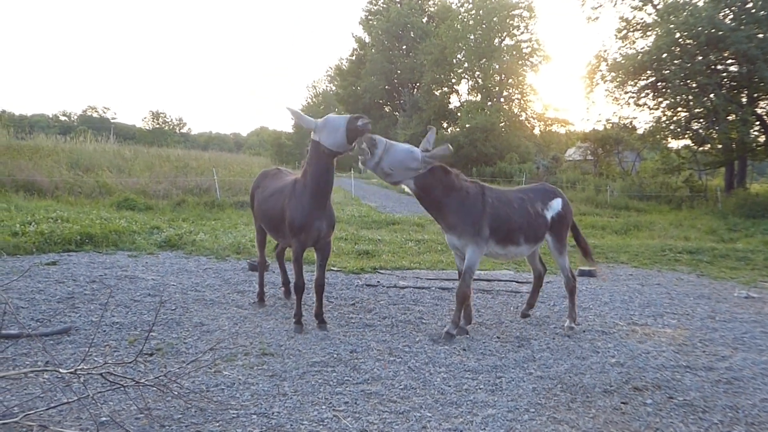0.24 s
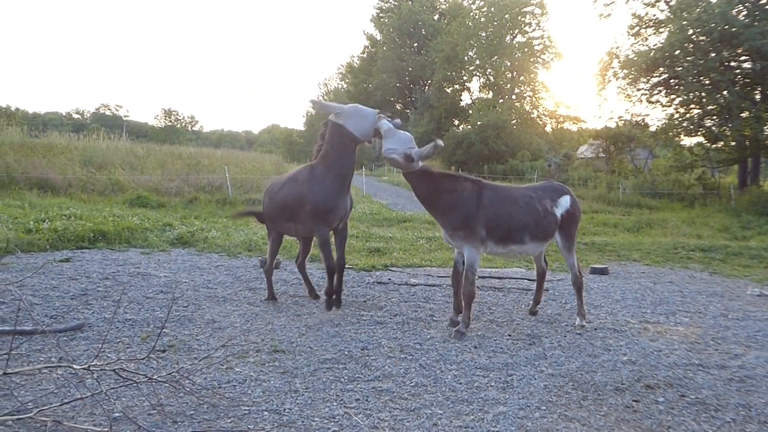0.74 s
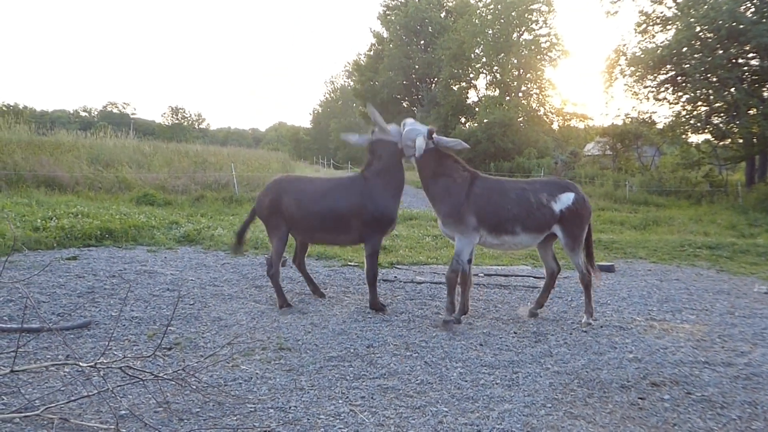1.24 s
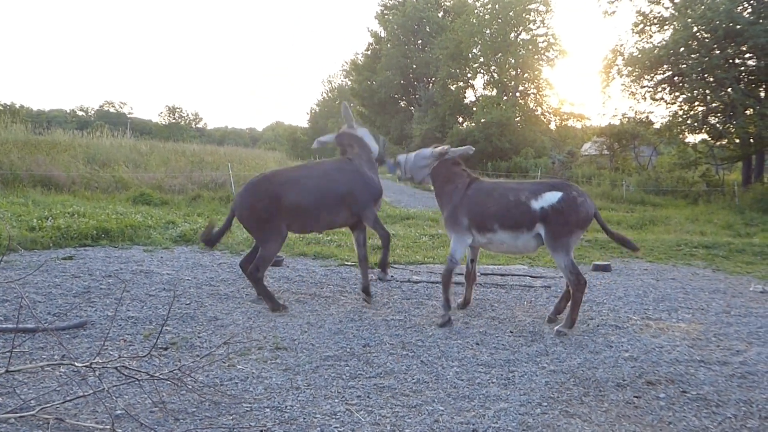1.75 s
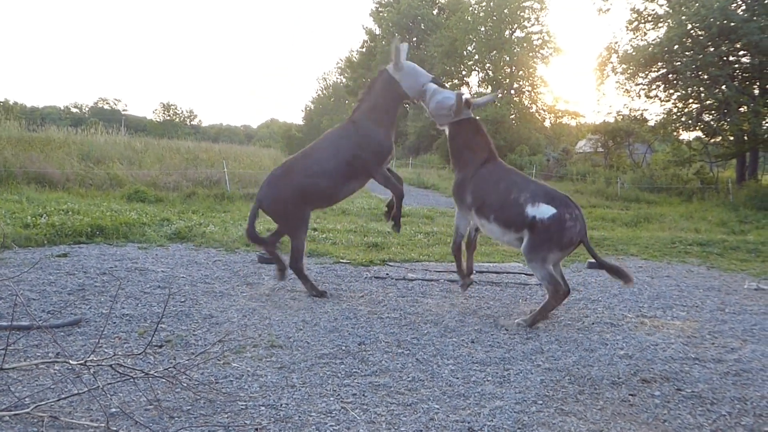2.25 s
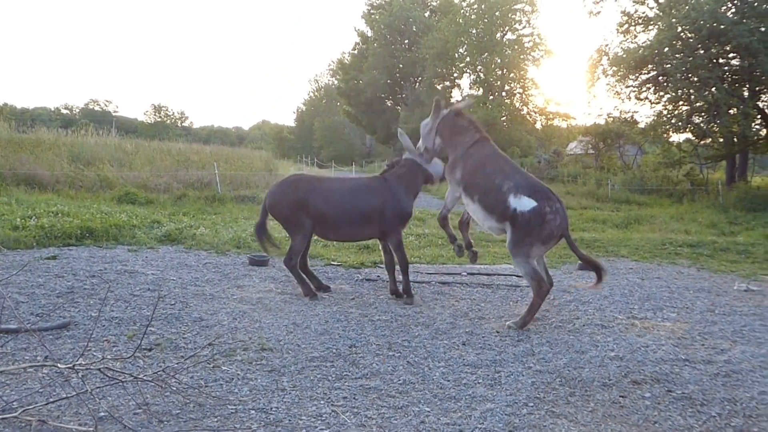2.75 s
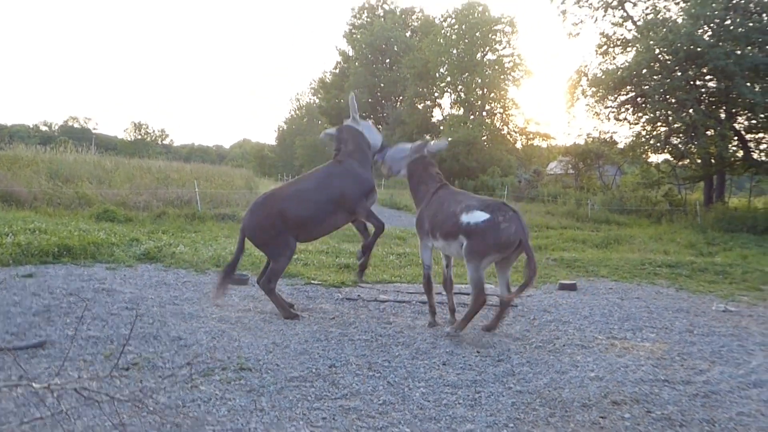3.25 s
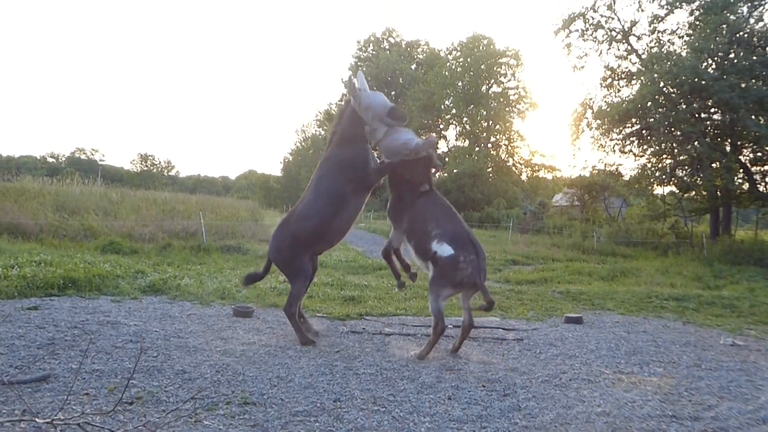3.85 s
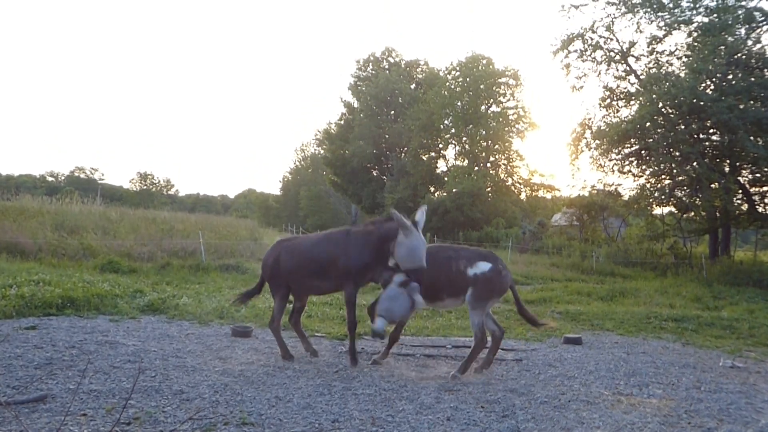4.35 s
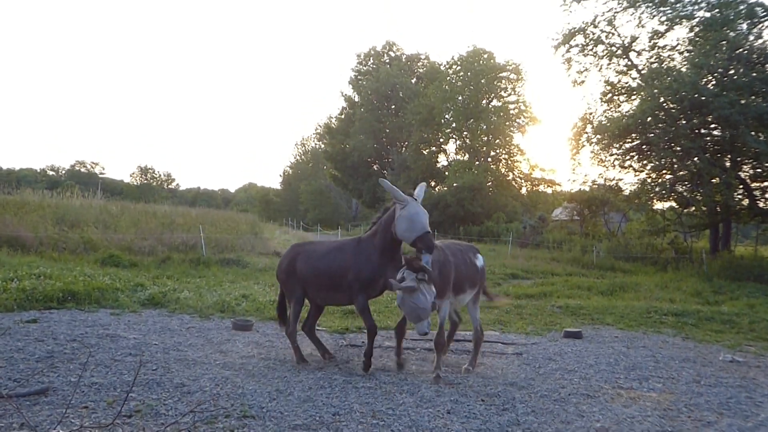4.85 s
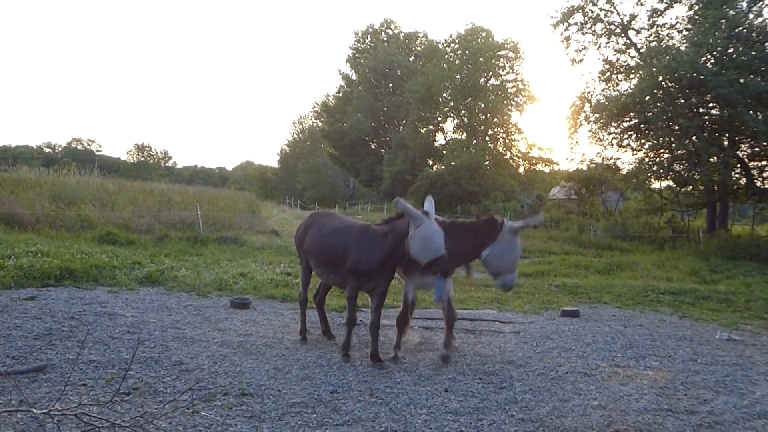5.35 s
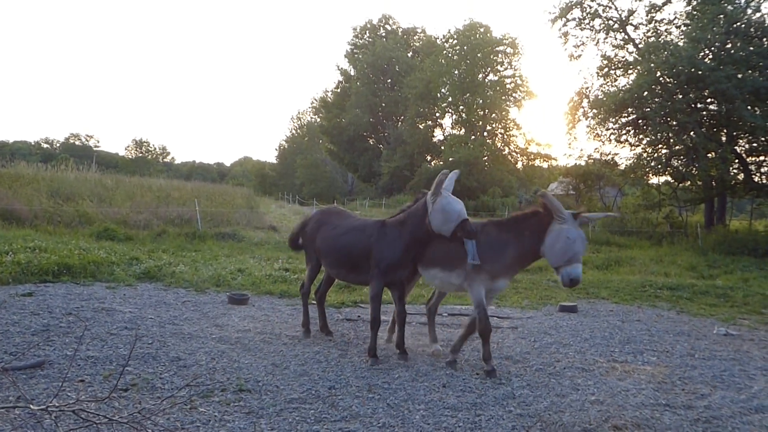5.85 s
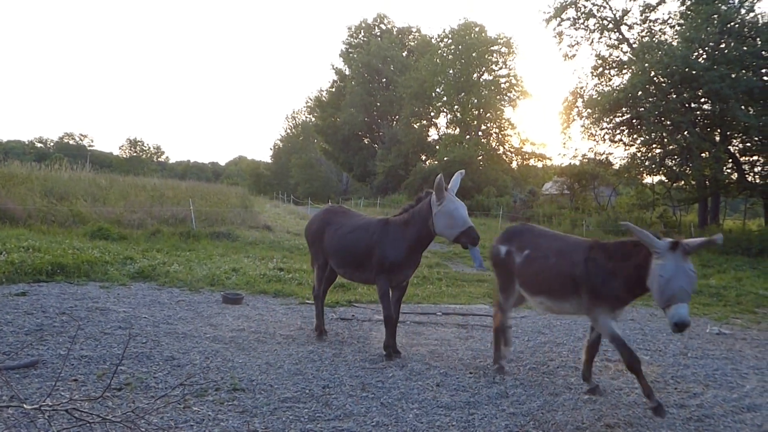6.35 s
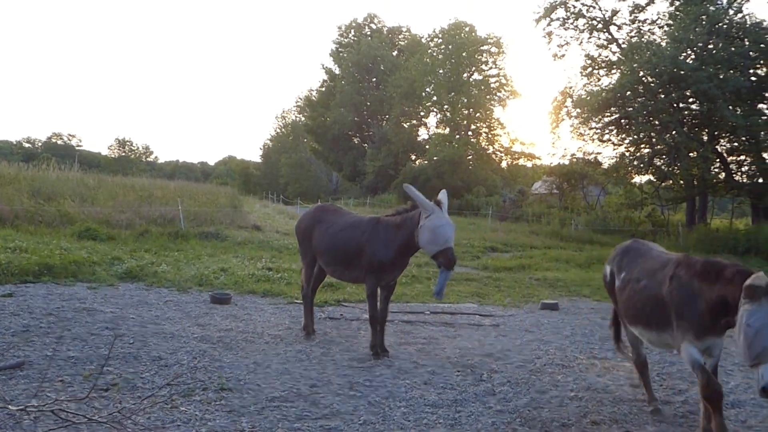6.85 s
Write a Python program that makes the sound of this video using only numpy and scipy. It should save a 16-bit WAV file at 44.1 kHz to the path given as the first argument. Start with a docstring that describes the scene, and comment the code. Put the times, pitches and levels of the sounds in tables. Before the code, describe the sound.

Hooves shift and stamp on a gravel yard, first in separate scrapes, then in heavy flurries with bright stone clicks, dry cracks and woody hoof knocks as two donkeys rear and wrestle. After more twisting and scraping, one walks off briskly past the close stereo microphones, crunching more crisply. The space is open and dry, with quiet steady air noise and a barely noticeable distant machine hum.

```python
"""Donkey hooves stamp and drag on a gravel yard: two animals play-fight, then one trots up to the microphone.
Their steps are many tiny random stone contacts, coloured as grit, pebbles, hoof and earth, with rise and fall.
Kicked stones click in short tones, pinched stones crack in snaps, and hollow knocks ring as fading tones.
Behind them, coloured noise makes an open-air rush with a thin hiss, and slow-wavering tones make a low hum."""
import sys
import numpy as np
from scipy import signal
from scipy.fft import rfft, irfft, next_fast_len
from scipy.io import wavfile
from scipy.ndimage import uniform_filter1d, map_coordinates

SR = 44100
rng = np.random.default_rng(int(sys.argv[2]) if len(sys.argv) > 2 else 0)


def master(y):
    """Save y as 16-bit WAV."""
    cut = np.clip(np.atleast_2d(y).T, -1, 1)
    pcm = np.round(cut * 32767)  # scale
    wavfile.write(sys.argv[1], SR, pcm.astype(np.int16))


N = 313659  # length in samples, about 7.1 s

# In this file, t60 or fade_s is the time in seconds to fade by 60 dB.
# Most sounds are (mid, side) pairs: what both ears share, and how they differ.


def amp(db):
    """Turn decibels into a gain."""
    return 10 ** (np.asarray(db) / 20)


def unit(x):
    """Scale a sound to an rms (average strength) of 1."""
    return x / np.sqrt(np.mean(x ** 2) + 1e-20)


def along(points, hz):
    """Read a curve of (pitch_hz, value) points, with pitch on a log axis."""
    point_hz, value = np.transpose(points)
    return np.interp(np.log(hz + 1), np.log(point_hz + 1), value)


def over_time(points):
    """Read a curve of (start_s, value) points at every sample."""
    return np.interp(np.arange(N) / SR, *np.transpose(points))


def wobble(rate, size=16):
    """A smooth random curve through `rate` random points a second."""
    coarse = np.arange(0, N + size, size)
    knots = rng.standard_normal(int(N * rate / SR) + 4)
    curve = map_coordinates(knots, [coarse * rate / SR])
    return np.interp(np.arange(N), coarse, curve)


def filtered(x, response):
    """Multiply the spectrum of x by a function of frequency."""
    m = next_fast_len(N + SR // 2)
    spectrum = rfft(x, m) * response(np.fft.rfftfreq(m, 1 / SR))
    return irfft(spectrum, m)[..., :N]


def coloured(x, spectrum, size=4096):
    """Give x a tone colour with a filter that never sounds early, so clicks keep sharp fronts."""
    gain = amp(along(spectrum, np.fft.rfftfreq(size, 1 / SR)))
    cepstrum = irfft(np.log(gain + 1e-6))
    # folding the second half onto the first packs the filter's energy at its start
    cepstrum[1:size // 2] *= 2
    cepstrum[size // 2 + 1:] = 0
    taps = irfft(np.exp(rfft(cepstrum)))
    return signal.oaconvolve(x, taps[None], axes=1)[:, :N]


def patchy(x, depth_db):
    """Shift the tone colour at random from moment to moment, then scale to rms 1."""
    z = signal.stft(x, nperseg=512)[2]
    field = rng.standard_normal(z.shape[1:])
    field = uniform_filter1d(field, size=4, axis=0)
    field = uniform_filter1d(field, size=5, axis=1)
    return unit(signal.istft(z * amp(depth_db * unit(field)), nperseg=512)[1][:, :N])


def stone(t60, snap, size=256):
    """One stone contact of energy 1: a share `snap` in one sharp sample, the rest in a brief noisy ring."""
    ring = rng.standard_normal((2, size)) * amp(-60 * np.arange(size) / SR / t60)
    ring[:, 0] = 0
    snap = np.clip(snap, 0, 1)
    ring *= np.sqrt(1 - snap) / np.linalg.norm(ring, axis=1, keepdims=True)
    ring[:, 0] = np.sqrt(snap) * rng.choice([-1, 1], 2)
    return ring


def impact(spectrum, t60, snap):
    """One hard contact with the given colour, peak 1."""
    hit = coloured(stone(t60, snap), spectrum)
    return hit / np.abs(hit).max(axis=1, keepdims=True)


def add_at(out, s, sound):
    """Mix a short sound into out, starting at s seconds."""
    out[:, round(s * SR):][:, :sound.shape[1]] += sound


# Colour of the open-air rush and thin hiss: pitch_hz, level_db (relative, per Hz)
AIR_COLOUR = [(25, -19), (55, -34), (75, -18), (110, -1.5), (150, 0), (230, 0), (330, -1.5), (500, 2),
              (900, -1), (1300, -5.5), (1700, -11.5), (3000, -13.5), (6000, -13), (10000, -16),
              (15500, -29)]
# Tones of far machinery: pitch_hz, level_db (rms, about which it wavers)
HUM_TONES = [(119.5, -60.5), (187, -58.5), (220, -57), (280, -68.5)]


def background():
    """Air is coloured noise; far machinery is a few tones that waver in level and phase."""
    t = np.arange(N) / SR
    rush = patchy(coloured(rng.standard_normal((2, N)), AIR_COLOUR), depth_db=2.0)
    air = amp(-46.5 + 0.25 * wobble(5.2)) * rush
    for hz, db in HUM_TONES:
        level = amp(db + 1.7 * wobble(6)) * np.sqrt(2)
        phase = 2 * np.pi * hz * t + 0.63 * wobble(6.4)
        air[0] += level * np.sin(phase)
    return air


# Hollow knocks of hooves on the ground and of the animals against each other:
# start_s, pitch_hz, fade_s, level_db (before KNOCK_MIX_DB, which lowers the ringing)
KNOCK_HITS = [(0.179, 890, .02, -29), (.19, 780, 0.028, -22), (.215, 820, 0.017, -17),
              (.259, 670, 0.019, -16.5), (.5192, 1273, 0.072, -22), (.521, 774, .03, -19),
              (0.5412, 860, 0.019, -12), (.544, 470, 0.035, -18), (.633, 640, .015, -15),
              (.648, 1120, 0.017, -13), (.648, 447, .025, -21), (1.593, 845, 0.018, -10.5),
              (1.599, 624, 0.015, -9), (1.659, 1280, .02, -16), (1.689, 1250, .03, -15),
              (1.697, 740, 0.025, -12.5), (1.718, 776, 0.019, -15), (1.779, 1280, .06, -21),
              (1.793, 1240, 0.031, -14.5), (1.8032, 780, 0.027, -11.5), (1.817, 1175, 0.036, -14),
              (1.841, 1185, 0.037, -21), (2.176, 845, 0.14, -28), (2.21, 715, .05, -25),
              (2.218, 255, 0.11, -27), (2.33, 165, .065, -19.5), (2.3758, 447, 0.095, -15),
              (2.376, 320, 0.02, -22), (2.467, 656, 0.04, -21.5), (2.504, 1150, 0.071, -23),
              (2.544, 1250, 0.02, -15.5), (2.595, 1000, .018, -20), (3.096, 1225, 0.033, -15),
              (3.1, 92, .26, -31), (3.106, 172, 0.091, -29), (3.1011, 1306, 0.024, -9),
              (3.108, 1150, 0.026, -13), (3.1172, 790, .03, -18), (3.124, 1280, .03, -15),
              (3.129, 234, 0.054, -29), (3.1365, 700, 0.011, -9), (3.6735, 1410, 0.015, -2),
              (3.674, 690, 0.014, -15), (3.681, 1420, .02, -14), (3.739, 796, 0.028, -18),
              (3.932, 895, .018, -17), (4.0815, 635, 0.013, -2), (4.094, 1300, .035, -26),
              (4.1141, 740, 0.038, -17.5), (4.198, 710, 0.026, -18), (4.209, 154, 0.11, -26),
              (4.24, 453, .025, -16), (4.344, 890, .02, -23), (4.491, 200, .07, -27),
              (4.562, 332, 0.036, -16), (4.624, 230, .04, -24), (4.845, 129, .11, -25),
              (4.881, 800, .025, -23), (5.283, 765, 0.028, -23), (5.336, 1070, 0.012, -9),
              (5.475, 745, 0.15, -28.5), (6.1504, 700, 0.012, -8.5), (6.491, 767, .04, -23),
              (6.501, 1300, 0.017, -18.5), (6.587, 1300, .02, -25)]
KNOCK_MIX_DB = -7.5
KNOCK_SWELL_S = .002  # shortest time scale of the swell


def knocks():
    """Each knock rings one fading, slightly rough tone; deep ones take longer to swell."""
    out, t = np.zeros((2, N + SR)), np.arange(SR // 4) / SR
    for s, hz, t60, db in KNOCK_HITS:
        roughness = 0.021 * np.cumsum(rng.standard_normal(len(t))) * np.sqrt(hz / 800)
        swell = 1 - np.exp(-(t / max(KNOCK_SWELL_S, 1 / hz)) ** 2)
        fade = amp(db - 60 * t / max(t60, .005))
        start_phase = rng.uniform(0, 2 * np.pi, (2, 1))
        add_at(out, s, swell * fade * np.sin(2 * np.pi * hz * t + roughness + start_phase))
    return amp(KNOCK_MIX_DB) * out[:, :N]


# level relative to the knock's strength just after its swell, before KNOCK_MIX_DB; fade time
CLACK_DB, CLACK_T60_S = -10, 0.0073
CLACK_FROM_HZ = 600  # only knocks above this pitch have a clack


def clacks():
    """Higher knocks are hoof on stone: a hard clack near their start follows their strength."""
    out = np.zeros((2, N + SR))
    for s, hz, t60, db in KNOCK_HITS:
        if hz > CLACK_FROM_HZ:
            hit = impact(HOOF_COLOUR, CLACK_T60_S, snap=0.59)
            swelled_db = db - 60 * KNOCK_SWELL_S / max(t60, .005)
            add_at(out, s + KNOCK_SWELL_S, amp(CLACK_DB + swelled_db) * hit)
    return out[:, :N]


# Larger stones that give way when pinched under a hoof: start_s, level_db (peak)
CRACK_HITS = [(.158, -23), (.2144, -35), (.7583, -19), (1.2935, -22), (1.3832, -18), (1.5953, -15),
              (1.6017, -21), (1.7338, -17), (1.819, -18), (1.8273, -20), (2.4217, -20), (2.4611, -21),
              (2.5756, -17.5), (2.6202, -24), (2.7965, -35), (3.0926, -18), (3.1374, -22), (3.3545, -17),
              (3.5977, -15), (3.613, -19), (3.6733, -12), (3.6745, -17), (3.6765, -19), (3.7172, -19),
              (4.184, -25), (4.2075, -22), (4.2395, -22), (4.2522, -21), (4.271, -23), (4.5575, -21),
              (4.963, -15), (5.0181, -18), (5.2298, -19), (5.6008, -20), (5.7198, -17), (5.8597, -27),
              (6.0767, -26), (6.1355, -21), (6.1405, -19), (6.4204, -22), (6.4868, -28), (6.79, -30),
              (6.801, -28), (6.811, -29), (6.869, -30), (7.0333, -23)]
# Colour of a crack: pitch_hz, level_db (relative, per Hz)
CRACK_COLOUR = [(300, -24), (1000, -21), (1800, -6), (3000, -4), (5000, -1), (7500, -1), (11000, 1),
                (15000, -15)]
CRACK_RING_T60_S, CRACK_SNAP = 0.0066, .33  # fade of the ring; share of energy in the first snap


def cracks():
    """Each pinched stone gives one dry crack: a snap and a brief noisy ring."""
    out = np.zeros((2, N + SR))
    for s, db in CRACK_HITS:
        add_at(out, s, amp(db) * impact(CRACK_COLOUR, CRACK_RING_T60_S, CRACK_SNAP))
    return out[:, :N]


STRAYS_PER_S = 50
STRAY_DB, STRAY_SPREAD_DB = 8.5, 1  # level over the shuffle curve; random spread


def stray_stones(count=500):
    """More stone clicks at random times, louder when the animals shuffle more: (start_s, level_db)."""
    gap, scatter = rng.exponential(size=count), rng.standard_normal(count)
    times = np.cumsum(gap) / STRAYS_PER_S
    shuffle_db = np.interp(times, *np.transpose(SHUFFLE_CURVE))
    levels = shuffle_db + STRAY_DB + STRAY_SPREAD_DB * np.minimum(scatter, 1.5)
    return [(s, db) for s, db in zip(times, levels) if s < N / SR]


CLICK_HZ, CLICK_PITCH_SPREAD = 10500, 0.147  # middle pitch; how far it varies, as a share
CLICK_RISE_S, CLICK_T60_S = 0.00017, 0.0047


def pebble(snap_db, size=256):
    """Click of one flying stone, peak 1: a noisy snap and two brief tones at one random pitch per channel."""
    t = np.arange(size) / SR
    hz = CLICK_HZ * (1 + CLICK_PITCH_SPREAD * rng.uniform(-0.86, 1, (2, 1)))
    tones = np.sin(2 * np.pi * (hz * t + rng.random((2, 2, 1)))).sum(axis=1)
    noise = rng.standard_normal((2, size))
    snap = coloured(noise, GRIT_COLOUR) + amp(-15.5) * coloured(noise, PEBBLE_COLOUR)
    rise = 1 - np.exp(-(t / CLICK_RISE_S) ** 2)
    click = (tones + amp(snap_db) * snap[:, :size]) * amp(-60 * t / CLICK_T60_S) * rise
    return click / np.abs(click).max(axis=1, keepdims=True)


# Single stone clicks, faint to loud, at set times: start_s, level_db (peak of the first click)
KICKS = [(.050, -29.5), (.100, -22.5), (.302, -16), (.370, -17), (.735, -16), (.758, -23), (.9293, -14),
         (.9453, -13.5), (.9899, -17.5), (1.0009, -19), (1.2785, -19), (1.4574, -18), (1.7677, -7),
         (1.8014, -10.5), (1.8273, -12), (1.856, -12.5), (1.942, -16), (1.9647, -18), (2.0184, -9),
         (2.0615, -16), (2.076, -14), (2.0882, -22), (2.4217, -20), (2.5606, -15), (2.5758, -13),
         (2.616, -12), (2.6202, -12.5), (2.6395, -12.5), (2.6709, -10.5), (2.692, -10), (2.7966, -15.5),
         (3.2408, -22), (3.3855, -13), (3.4349, -10.5), (3.4471, -10), (3.5135, -10.5), (3.589, -13),
         (3.613, -12), (3.6788, -8), (3.9582, -16), (4.2426, -2), (4.4157, -14), (4.6741, -15),
         (4.7444, -8), (4.9115, -16), (4.918, -16), (5.0043, -14), (5.1363, -20), (5.1415, -11.5),
         (5.2857, -7.5), (5.3019, -16), (5.395, -2.5), (5.4356, -8.5), (5.4421, -10), (5.4658, -11),
         (5.5915, -18), (5.6025, -16), (5.6848, -15), (5.823, -16), (5.9, -18), (5.9464, -16.5),
         (6.1779, -15), (6.4017, -9), (6.4064, -18), (6.4201, -15), (6.4411, -13), (6.4842, -10),
         (6.5139, -24), (6.7548, -22), (6.9654, -19), (6.9796, -17.5), (7.0335, -16.5)]
RIM_DB = -1  # the hoof's rim strikes one stone first, at this level relative to the stamp's grit
REBOUND_LOSS_DB = 10  # each rebound is this much weaker than the hit before it


def kicked_stones():
    """Struck and loose stones give one bright click and two fainter rebounds."""
    out = np.zeros((2, N + SR))
    rims = [(s - .001, grit_db + RIM_DB) for s, _, grit_db, _ in HOOF_STAMPS]
    for s, db in [*KICKS, *rims, *stray_stones()]:
        click = pebble(snap_db=4)
        rebounds = np.cumsum([0, *rng.uniform(.001, 0.0045, size=2)])
        for k, delay in enumerate(rebounds):
            add_at(out, s + delay, amp(db - REBOUND_LOSS_DB * k) * click)
    return out[:, :N]


GRIT_SNAP = .4  # share of a small contact's energy in its first snap


def contacts(rate, spread_db, clump_db, ring_t60, evenness, count=96):
    """Stones of many shapes collide `rate` times a second, in little rattles a few milliseconds long."""
    when = np.flatnonzero(rng.random(N) < rate / SR)
    rattle_db = clump_db * np.minimum(wobble(380), 2)
    scatter_db = spread_db * np.minimum(rng.standard_normal(N), 2.3)
    force = amp(rattle_db + scatter_db) * rng.choice([-1, 1], N)
    shapes = np.stack([stone(ring_t60, GRIT_SNAP, size=160) for _ in range(count)], axis=1)
    rings = force[when, None] * shapes[:, rng.integers(count, size=N)[when]]
    places = (when[:, None] + np.arange(rings.shape[-1])).ravel()
    out = np.array([np.bincount(places, ring.ravel(), N)[:N] for ring in rings])
    # contacts of one moment share the work of the hoof, so busy moments are turned down
    power = np.abs(uniform_filter1d(out[0] ** 2, size=800))
    return unit(out / (power + .02 * power.mean()) ** (np.clip(evenness, 0, 1) / 2))


STAMP_RISE_S = 0.019  # time for 60 dB of build-up


def stamp(s, t60):
    """Strength of a hoof set down: it bites quickly until s, then the stones come to rest."""
    age = np.arange(N) / SR - s
    near = slice(*np.searchsorted(age, [-STAMP_RISE_S, t60]))
    envelope = np.zeros(N)
    envelope[near] = amp(-60 * np.maximum(-age[near] / STAMP_RISE_S, age[near] / t60))
    return envelope


DRAG_EDGE_DB, DRAG_SHAPE = -10.5, 1.43  # level at half a length from the middle; 1 = pointed, 2 = rounded


def drag(s, length):
    """Strength of a hoof sliding through the stones: an arch around s."""
    offset = (np.arange(N) / SR - s) / (length / 2)
    near = np.abs(offset) < 3
    envelope = np.zeros(N)
    envelope[near] = amp(DRAG_EDGE_DB * np.abs(offset[near]) ** DRAG_SHAPE)
    return envelope


PEBBLE_WEIGHT_SHARE = 0.29  # how far the pebble level lies from grit (0) towards hoof weight (1)


def layer_gains(grit_db, hoof_db, dug_db):
    """Gains of grit, pebbles and hoof: a heavier hoof digs down to more pebbles."""
    pebble_db = grit_db + PEBBLE_WEIGHT_SHARE * (hoof_db - grit_db) + dug_db
    return amp([grit_db, pebble_db, hoof_db])


# Shifting weight keeps the gravel moving between steps: start_s, level_db (before slips and layer offsets)
SHUFFLE_CURVE = [(0, -43), (.14, -64), (.22, -41), (.55, -42.5), (.77, -45), (.97, -42.5), (1.25, -36),
                 (1.8, -29), (2.05, -37.5), (2.27, -38), (2.45, -34), (2.76, -38), (2.94, -42),
                 (3.09, -38.5), (3.45, -34), (3.87, -29), (4.04, -32.5), (4.22, -30.5), (4.31, -36.5),
                 (4.36, -36.5), (4.55, -35.5), (4.68, -39), (4.87, -36), (4.97, -30), (5.12, -29.5),
                 (5.21, -33.5), (5.55, -35), (5.85, -34), (5.99, -39), (6.1, -44), (6.21, -36), (6.27, -39),
                 (6.35, -37.5), (6.55, -44.5), (6.64, -53), (6.9, -38), (7.11, -48)]
# Offsets on that curve, one each for grit, pebbles and hoof: level_db
SHUFFLE_LAYERS = [-0.6, -12, -18.5]
# Hooves set down: start_s (full force), fade_s, grit_level_db, hoof_weight_level_db
HOOF_STAMPS = [(.155, 0.18, -23.5, -45.5), (.523, 0.25, -41, -37.5), (0.543, 0.096, -35.5, -41),
               (1.118, 0.24, -30.5, -37.5), (1.295, 0.32, -24.5, -36.5), (1.604, 0.14, -26, -34),
               (1.675, 0.2, -28.5, -33), (1.734, 0.18, -28, -36.5), (1.787, 0.55, -35, -35.5),
               (1.839, 0.23, -31, -42), (2.3, 0.26, -22.5, -39.5), (2.464, 0.27, -22, -37),
               (2.509, 0.32, -33, -41.5), (3.097, 0.17, -21, -31), (3.136, 0.04, -35, -30),
               (3.355, 0.24, -22.5, -33), (3.674, 0.15, -19, -31), (3.717, 0.3, -28.5, -34),
               (3.823, 0.18, -25, -41), (3.849, 0.19, -29.5, -32.5), (4.345, 0.17, -46, -41),
               (4.555, 0.13, -22.5, -34.5), (4.797, 0.21, -22.5, -50), (4.884, 0.1, -25, -35.5),
               (5.058, 0.27, -28.5, -52), (5.282, 0.096, -26.5, -35.5), (5.462, 0.18, -21, -42),
               (5.526, 0.059, -23, -47), (5.879, .2, -31.5, -57), (6.136, 0.12, -19, -37),
               (6.281, 0.27, -29.5, -38), (6.483, 0.15, -27, -40.5), (6.587, 0.13, -39.5, -43.5),
               (6.666, 0.17, -21, -36), (6.792, 0.21, -28.5, -34.5), (7.048, .16, -36.5, -43.5)]
# Hooves dragged or twisted through stones: middle_s, length_s, grit_level_db, hoof_weight_level_db
HOOF_DRAGS = [(0.282, 0.04, -26.5, -39), (0.408, 0.076, -32, -47), (0.609, 0.037, -30, -39),
              (0.639, 0.052, -32.5, -38.5), (0.748, 0.12, -27.5, -48), (0.844, 0.13, -29, -75),
              (1.075, 0.059, -38, -40), (1.186, 0.029, -29, -58), (1.248, 0.028, -32, -41.5),
              (1.325, 0.1, -36, -37.5), (1.572, 0.13, -24.5, -41), (1.97, 0.19, -36, -69),
              (2.101, 0.039, -32, -40), (2.15, 0.065, -27.5, -45), (2.195, 0.065, -20.5, -33),
              (2.433, 0.053, -27, -68), (2.471, 0.026, -25.5, -53), (2.704, 0.04, -26, -34.5),
              (3.011, 0.069, -33, -43.5), (3.283, 0.084, -25.5, -41.5), (3.619, 0.046, -22, -37.5),
              (3.682, 0.014, -24, -39), (3.97, 0.17, -49, -46), (4.1, .03, -44, -41),
              (4.205, 0.023, -25.5, -33.5), (4.242, 0.05, -23.5, -37.5), (4.282, 0.036, -28.5, -36.5),
              (4.517, 0.072, -27.5, -37), (4.563, 0.011, -22, -33), (4.619, 0.065, -35.5, -36),
              (4.745, 0.072, -22, -47), (4.831, 0.08, -24, -36), (4.921, 0.081, -23, -47),
              (4.959, 0.028, -25.5, -54), (5.132, 0.18, -34, -59), (5.26, 0.052, -33, -46),
              (5.378, 0.045, -21.5, -42.5), (5.675, 0.083, -31.5, -52), (5.713, 0.052, -28, -50),
              (5.761, 0.07, -28.5, -60), (5.795, 0.038, -29.5, -45), (5.902, 0.076, -31, -62),
              (6.661, .007, -33, -46), (6.677, 0.018, -25, -44), (6.809, 0.015, -29.5, -39),
              (6.859, 0.064, -29, -41.5)]
SLIP_DB, SLIPS_PER_S = 2.5, 60  # the gravel gives way in small slips
SETTLE_DB, SETTLE_T60_S = -22, 0.76  # disturbed stones keep trickling after a stamp
SINK_S, BEARING_STRETCH = 0.0025, 1.15  # weight comes just after the bite and fades this many times slower
STAMP_PEBBLE_DB, DRAG_PEBBLE_DB = -5, -5.5  # a stamp digs up more pebbles than a drag


def footwork():
    """Strength of grit, pebbles and hoof: the powers of shuffle, stamps and drags add up."""
    shuffle_db = over_time(SHUFFLE_CURVE) + SLIP_DB * wobble(SLIPS_PER_S)
    power = amp(shuffle_db + np.array(SHUFFLE_LAYERS)[:, None]) ** 2
    for s, t60, grit_db, hoof_db in HOOF_STAMPS:
        stones = stamp(s, t60) ** 2 + (amp(SETTLE_DB) * stamp(s, SETTLE_T60_S)) ** 2
        weight = stamp(s + SINK_S, BEARING_STRETCH * t60) ** 2
        gains = layer_gains(grit_db, hoof_db, STAMP_PEBBLE_DB)
        power += gains[:, None] ** 2 * [stones, stones, weight]
    for s, length, grit_db, hoof_db in HOOF_DRAGS:
        gains = layer_gains(grit_db, hoof_db, DRAG_PEBBLE_DB)
        power += np.outer(gains ** 2, drag(s, length) ** 2)
    return np.sqrt(power)


# Four colours, each with columns pitch_hz, level_db (relative, per Hz)
# small sharp stones
GRIT_COLOUR = [(2940, -49.5), (5000, -17.5), (6760, -8), (7860, -8.5), (9690, 2), (10900, 2.5),
               (13000, -10), (15000, -24.5), (15500, -33), (16000, -19.5)]
# larger pebbles
PEBBLE_COLOUR = [(900, -31), (1600, -11), (2200, -5), (3000, 4.5), (4500, 3), (6000, -2), (7500, -11.5),
                 (10000, -47.5)]
# hollow hoof
HOOF_COLOUR = [(60, -33), (100, -16), (200, -4), (330, -3), (500, -3), (720, 3.5), (930, -3.5), (1250, 1),
               (1600, -6), (2400, -8), (5000, -69.5)]
# thud of the ground
EARTH_COLOUR = [(30, -60), (60, -36), (90, -3), (160, -3.5), (280, 3), (600, -22), (1500, -64)]
SAND_DB = -8  # the hiss of the finest grains stays under the crunch


def gravel():
    """Stone contacts sound in grit, pebbles and hoof, over a thud; more force moves more stones."""
    grit, pebbles, hoof = footwork()
    load = grit / amp(-32)
    # lightly loaded gravel rattles stone by stone; under a full hoof it crunches as one
    crush = contacts(4600 * load ** .7, spread_db=4.0, clump_db=6 / (1 + load), ring_t60=0.0024, evenness=0.8)
    # the broad sole presses many stones at once
    tread = contacts(3500, spread_db=4.0, clump_db=4.0, ring_t60=0.0026, evenness=0.8)
    # pebbles are fewer than grit and tick one by one
    ticks = contacts(1100 * load ** 0.64, spread_db=4.5, clump_db=2, ring_t60=0.0046, evenness=0.93)
    sand = rng.standard_normal((2, N))  # the finest grains merge into a hiss
    crunch = crush + amp(SAND_DB) * sand
    bright = grit * patchy(coloured(crunch, GRIT_COLOUR), depth_db=1.0)
    coarse = pebbles * patchy(coloured(ticks + amp(-2.5) * crunch, PEBBLE_COLOUR), depth_db=1.7)
    hollow = hoof * patchy(coloured(tread + amp(-5.5) * crush, HOOF_COLOUR), depth_db=2.0)
    thud = hoof * unit(coloured(rng.standard_normal((2, N)), EARTH_COLOUR))
    return bright + amp(-1.5) * coarse + amp(-0.84) * hollow + amp(-13.0) * thud


# One donkey trots up to the microphone: start_s, nearness (0 far to 1 near)
NEAR_CURVE = [(5.8, 0.24), (6.7, 0.67)]
# Close steps sound crisper: pitch_hz, gain_db (at nearness 1)
CLOSE_COLOUR = [(500, -2), (1100, -2), (1750, 5.5), (3000, -3), (6000, -1.5), (10500, -3), (13000, 4.5),
                (15000, -1)]


def approaching(x):
    """Blend the footwork towards its close colour as the donkey comes near."""
    near = np.clip(over_time(NEAR_CURVE), 0, 1)
    return (1 - near) * x + near * coloured(x, CLOSE_COLOUR)


def yard(x, t60, wet_db):
    """Ground and trees scatter a faint, short tail, made of fading noise."""
    t = np.arange(SR // 2) / SR
    tail = rng.standard_normal((2, len(t))) * amp(-60 * t / t60) * (1 - np.exp(-t / 0.0029))
    echo = signal.fftconvolve(x[:1], tail / np.linalg.norm(tail[0]), axes=1)[:, :N]
    return x + amp(wet_db) * echo


def narrowed(x, alike):
    """Turn down the side of a mid and side pair to the given left-right likeness."""
    def side_gain(hz):
        return np.tan(np.arccos(np.clip(along(alike, hz), 0, 1)) / 2)
    return np.array([x[0], filtered(x[1], side_gain)])


# How alike left and right are for the animals: pitch_hz, likeness (0 to 1)
ANIMALS_ALIKE = [(130, 1), (290, 1), (640, 0.98), (1410, 0.89), (3100, 0.92), (6820, 0.96), (10000, 0.97),
                 (15000, 0.94)]
# How alike left and right are for the background: pitch_hz, likeness (0 to 1)
BACKGROUND_ALIKE = [(60, 0.78), (130, 0.99), (290, .9), (640, 0.89), (1410, 0.24), (3100, 0.53),
                    (15000, 0.7)]
# Balance between the ears: pitch_hz, left_minus_right_db
EAR_BALANCE = [(60, 0), (110, -1.5), (200, -1), (380, -1.5), (700, -3.5), (1290, -4.5), (2380, -0.5),
               (4400, -0.5), (8120, -1.5), (15000, 0)]
# How far the left microphone is ahead: pitch_hz, lead_radians
LEFT_LEAD = [(500, 0.038), (900, 0), (1200, 0.45), (1700, 0.76), (2400, 0.33), (4000, 0.15), (8000, 0.17),
             (11000, 0.61), (13000, 0.18)]


def scene():
    """The animals are ahead of a close pair of microphones, with the background all around."""
    footsteps = approaching(gravel() + kicked_stones())
    animals = yard(footsteps + cracks() + knocks() + clacks(), t60=0.17, wet_db=-15.5)
    mid, side = narrowed(animals, ANIMALS_ALIKE) + narrowed(background(), BACKGROUND_ALIKE)
    half = np.array([[.5], [-.5]])  # left gets half of each difference, right the opposite half

    def ears(hz):
        return amp(half * along(EAR_BALANCE, hz)) * np.exp(1j * half * along(LEFT_LEAD, hz))
    return filtered(np.array([mid + side, mid - side]), ears)


TOP_HZ = 15900  # upper band limit


def record(dry):
    """The microphone sheds the deepest bass and keeps nothing above its band limit."""
    bass_cut = signal.butter(2, 42, "highpass", fs=SR, output="sos")
    return filtered(signal.sosfilt(bass_cut, dry), lambda hz: hz < TOP_HZ)


dry = scene()
out = record(dry)
master(out)
```